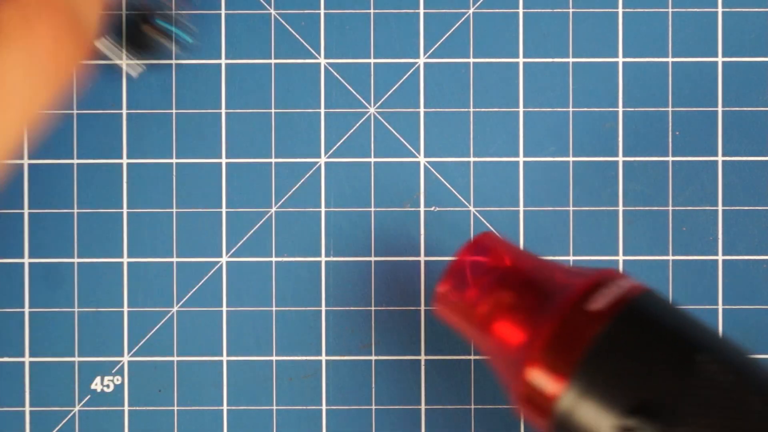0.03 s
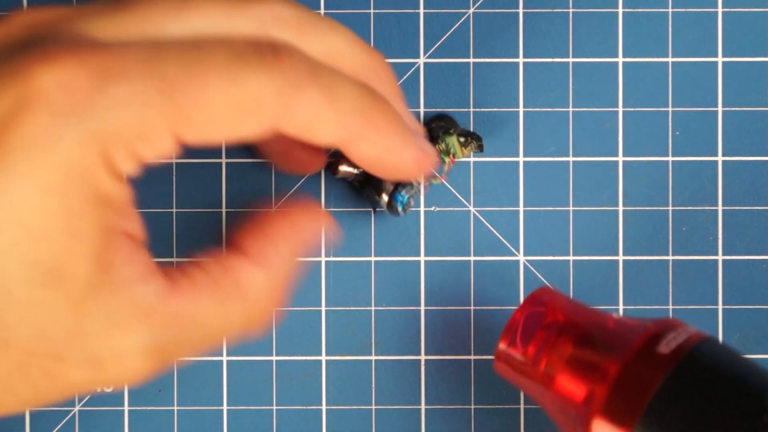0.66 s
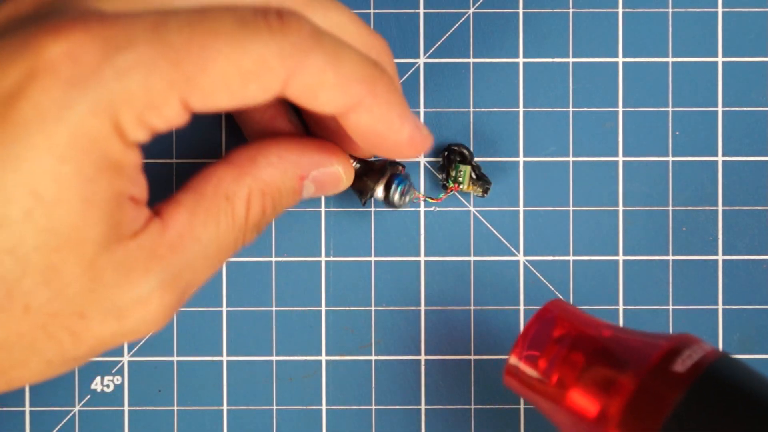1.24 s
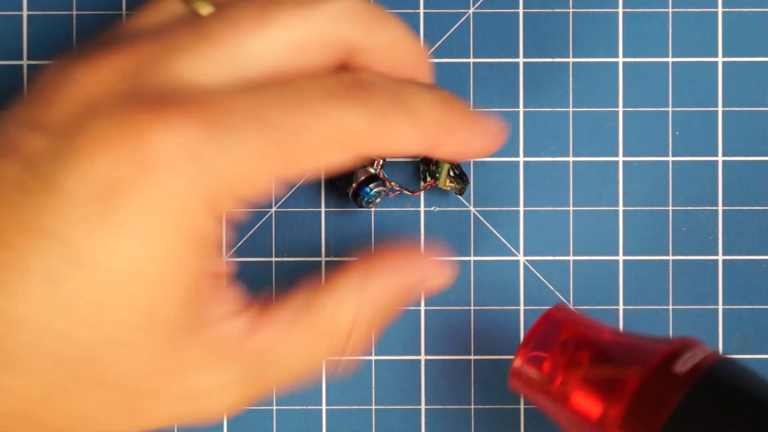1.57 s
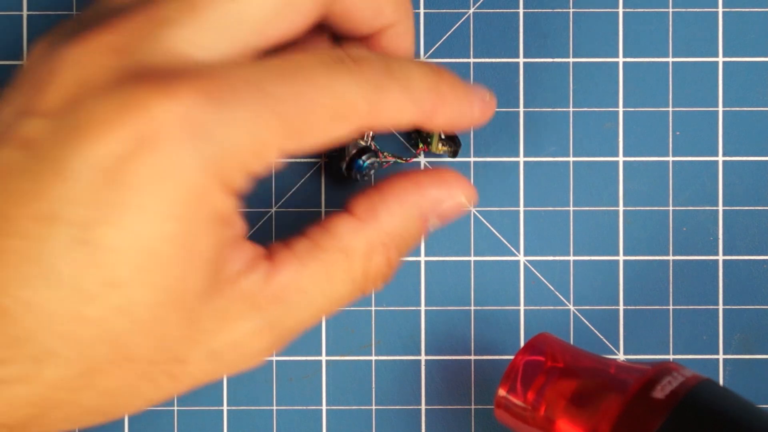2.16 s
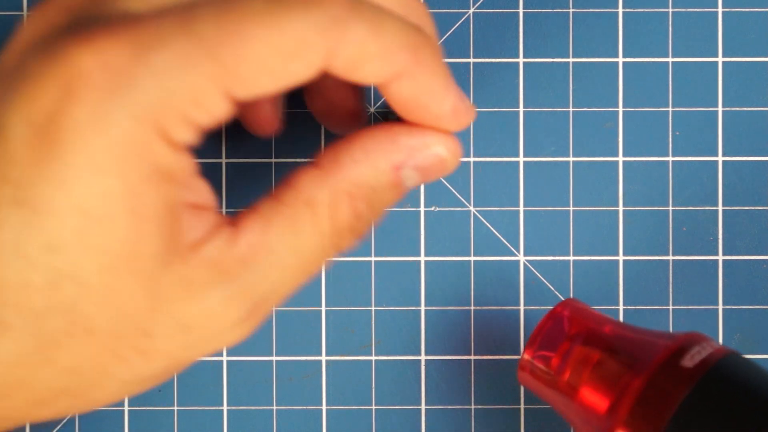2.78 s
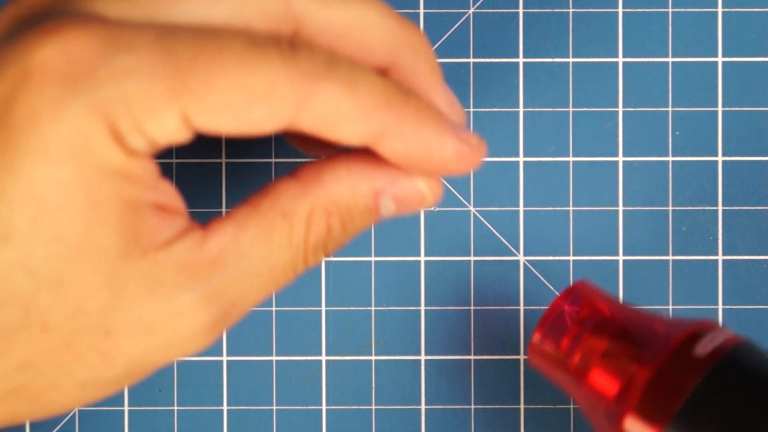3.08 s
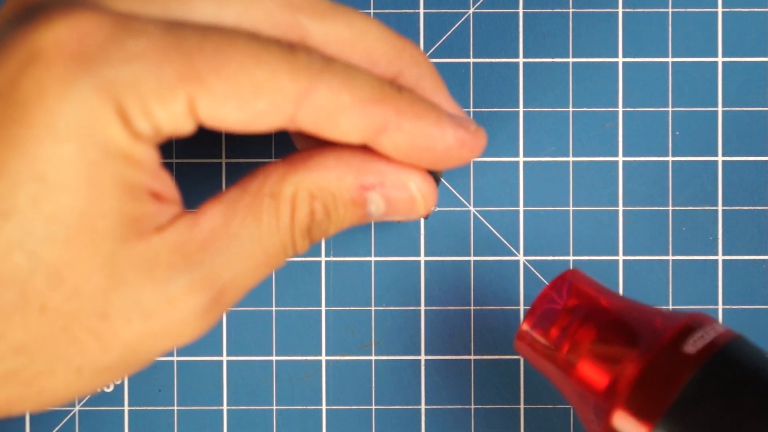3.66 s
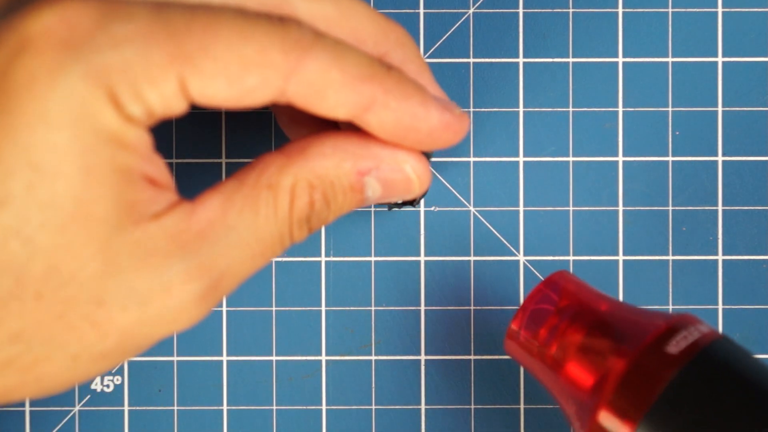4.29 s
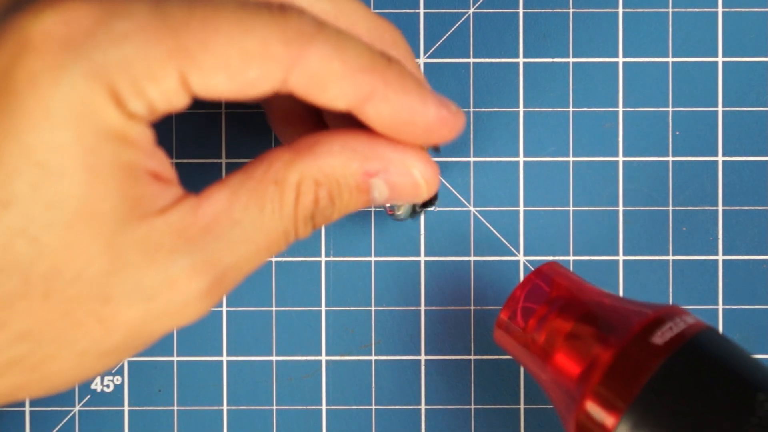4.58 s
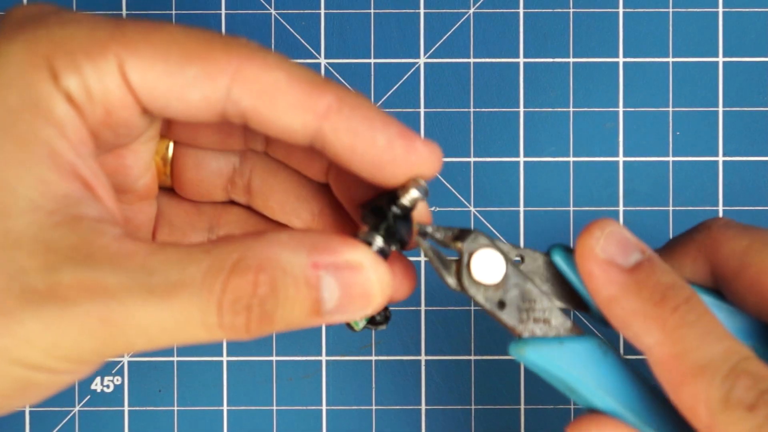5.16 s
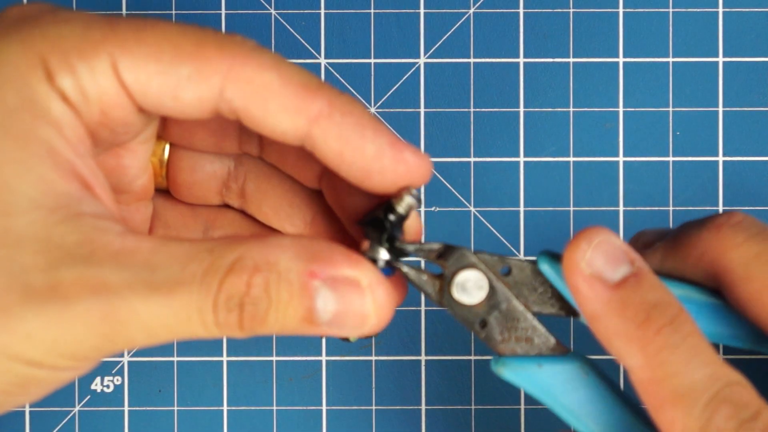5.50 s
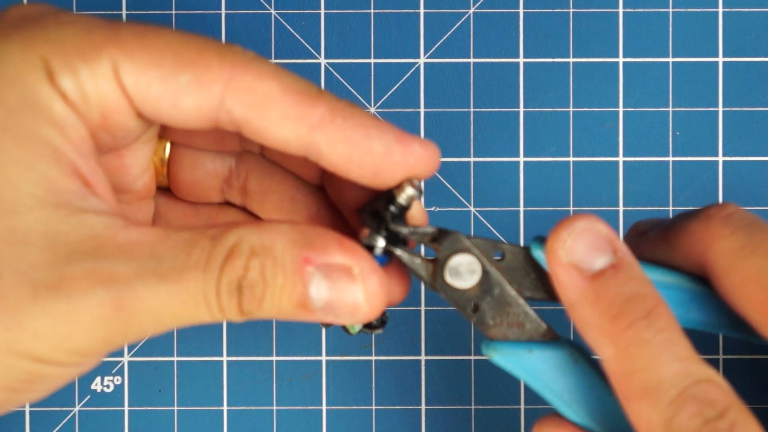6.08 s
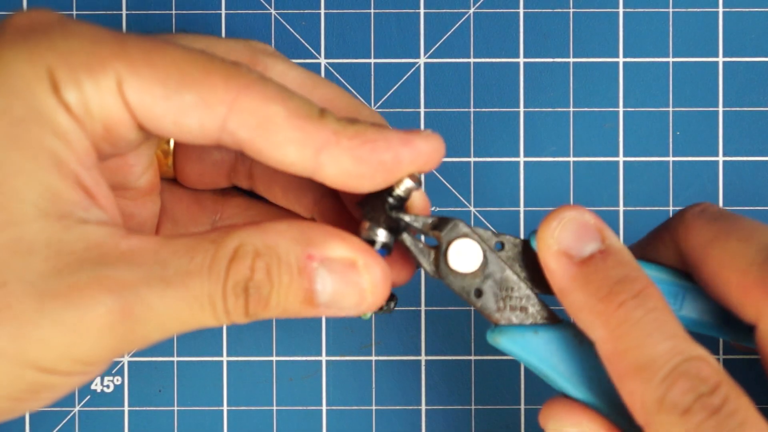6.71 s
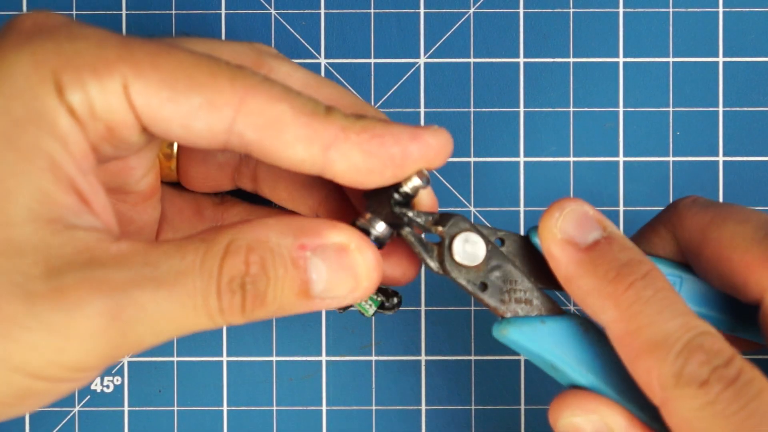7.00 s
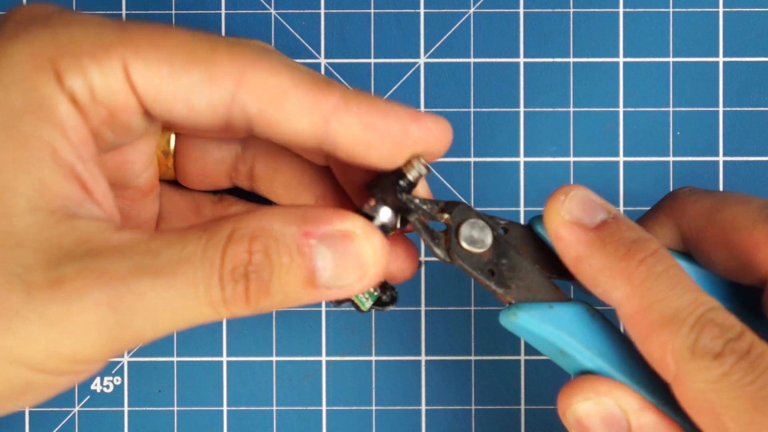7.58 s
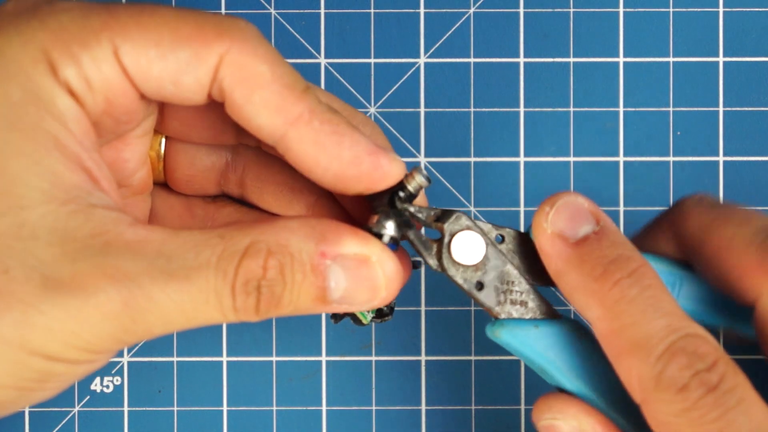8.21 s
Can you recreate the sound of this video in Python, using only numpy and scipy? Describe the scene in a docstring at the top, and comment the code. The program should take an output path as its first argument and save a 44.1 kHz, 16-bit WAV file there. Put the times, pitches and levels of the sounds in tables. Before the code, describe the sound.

A heat gun blows close to a stereo microphone, its fan whining over a steady rush of air, with a couple of clicks and low thumps early on. The draught briefly turns toward the microphone and rumbles softly. A little past halfway the gun stops abruptly, and tools clack on the workbench with a soft boom. In the quiet room, a faint squeak leads to a snip, then sparse ticks of cutters on wire.

```python
"""A heat gun blows on a small wired part above a workbench, close to a stereo microphone.
From the start its fan whines and air rushes through the barrel; two clicks and a few thumps come early.
At 1.5 s a hand cups the part, turning the draught onto the microphone, and at 3 s it draws back.
The rush ends abruptly at 4.8 s; tools click and the bench booms softly. In the quiet room a thin
squeak leads to a snip at 6.3 s, and the cutters go on ticking on wire."""
import sys
import numpy as np
from scipy import signal
from scipy.fft import rfft, irfft
from scipy.io import wavfile
from scipy.ndimage import uniform_filter1d, map_coordinates

SR = 44100
rng = np.random.default_rng(int(sys.argv[2]) if len(sys.argv) > 2 else 0)


def bounce(signal):
    """Save signal as a 16-bit WAV file at the path given by the first command-line argument."""
    frames = np.transpose(np.atleast_2d(signal))
    limited = np.clip(frames, -1, 1)
    pcm = np.round(limited * 32767).astype(np.int16)
    wavfile.write(sys.argv[1], SR, pcm)


N = 372380
T = np.arange(N) / SR
FREQ = np.maximum(np.arange(N // 2 + 1) * SR / N, 1)

# the hand cups the part in front of the nozzle, then draws back: (start [s], end [s], each move [s])
CUPPED_HAND = (1.54, 2.96, .2)


def undb(db):
    """Decibels to gain."""
    return 10 ** (np.asarray(db) / 20)


def unit(x):
    """Scale to rms 1."""
    return x / np.sqrt(np.mean(x ** 2))


def pan(db):
    """Left and right gains for a level difference."""
    return undb(np.array([[db], [-db]]) / 2)


def curve(points):
    """One value per sample from (time, value) points."""
    return np.interp(T, *np.transpose(points))


def fade(age, t60):
    """Silence before age 0, then an exponential decay."""
    return (age >= 0) * np.exp(-np.log(1000) * np.maximum(age, 0) / t60)


def hold(start, end, edge):
    """Rises to 1 around start, holds, and falls around end; each move takes edge seconds."""
    return np.clip(np.minimum(T - start, end - T) / edge + .5, 0, 1)


def swell(s, half_length):
    """A smooth rise and fall that peaks at time s."""
    return np.exp(-((T - s) / half_length) ** 2)


def walk(rate):
    """A random drift of spread about 1 that changes about rate times a second."""
    points = uniform_filter1d(rng.standard_normal(8192), 4)
    return 2 * np.interp(8 * rate * T, np.arange(len(points)), points)


def colour(points):
    """Gain at every frequency from (Hz, dB) points."""
    hz, db = np.transpose(points)
    return undb(np.interp(np.log(FREQ), np.log(hz), db))


def noise(gain):
    """Fresh noise with this gain at every frequency."""
    return irfft(rfft(rng.standard_normal(N)) * gain, N)


def wide_noise(gain, side):
    """Stereo noise of rms 1 from a mid and a side signal."""
    return unit(noise(gain) + noise(gain * side) * np.array([[1], [-1]]))


def split(x, hz):
    """The parts below and above a frequency."""
    low = irfft(rfft(x) / (1 + (FREQ / hz) ** 8), N)
    return low, x - low


def room_tone(hiss_db=-57, rumble_db=-60):
    """Microphone hiss over a low rumble that swells as the hands lean on the bench."""
    # the quiet room: (frequency [Hz], density [dB])
    spectrum = [(12, -44), (20, -7), (60, -2), (81, -9.5), (187, -18), (228, -20), (270, -22.5), (590, -29),
                (1090, -34), (1440, -36), (16000, -49)]
    # hands leaning on the bench: (time [s], level [dB], half length [s])
    leans = [(6.45, -66, 0.35), (8.05, -60, 0.26)]
    low, high = split(wide_noise(colour(spectrum), side=.87), hz=130)
    rumble = undb(rumble_db) + sum(undb(db) * swell(s, length) for s, db, length in leans)
    return (unit(low) * rumble + high * undb(hiss_db)) * pan(.4)


def bench_boom(rise_s=.012, right_lead_rad=1.92):
    """Each knock sets the bench top swinging."""
    # knocks on the bench: (time [s], level [dB], pitch [Hz], t60 [s])
    knocks = [(4.896, -37, 74.6, 0.16), (4.933, -30, 60.5, 0.83), (4.94, -37, 99.5, 0.67),
              (6.35, -44.5, 90.4, 0.6), (7.08, -45, 68, 0.17)]
    out = 0
    for s, db, hz, t60 in knocks:
        age = T - s
        swing = np.sin(2 * np.pi * hz * age + np.array([[0], [right_lead_rad]]))
        out = out + undb(db) * np.clip(age / rise_s, 0, 1) * fade(age, t60) * swing
    return out


def squeak(level_db=-77.5, jitter_hz=18, flicker_db=2, thinning_db_per_octave=85):
    """A faint, unsteady pure tone just before the snip; it thins out as it rises."""
    # the squeak's wavering course: (time [s], pitch [Hz])
    glide = [(6.015, 5730), (6.045, 5980), (6.085, 6000), (6.125, 5770), (6.17, 5820), (6.215, 6050),
             (6.27, 6380), (6.325, 5750)]
    hz = curve(glide)
    phase = 2 * np.pi * np.cumsum(hz + jitter_hz * walk(40)) / SR
    db = level_db - thinning_db_per_octave * np.log2(hz / hz.min()) + flicker_db * walk(6)
    return np.sqrt(2) * undb(db) * hold(glide[0][0], glide[-1][0], edge=.015) * np.sin(phase)


def tool_clicks(crack_t60=.013, room_t60=.3, room_rise_s=.0036, lead_s=.004):
    """A contact cracks and rings the steel; the room answers with a diffuse tail."""
    # clicks of tools and wire, and the snip's short echo just after it:
    # (time [s], attack rms [dB], tilt [dB/octave], room [dB], ring [dB])
    clicks = [(0.2151, -25, -7, 3, -3), (0.2735, -27.5, -7, -8, -20), (4.8952, -35.5, 4, -5.5, -3),
              (4.9278, -33, 0.5, -2.5, -18), (4.936, -31.5, 2.5, -8, -11), (4.9462, -47, -3, -3, -6),
              (5.0375, -56, -4, 0, -12), (5.5136, -52, -1, -8, -16), (5.586, -64, -4, -3, -17),
              (5.6075, -66, -3, -7, -14), (5.6243, -67, -2, -6, -14), (6.347, -49.5, -3, -7, 4),
              (6.364, -70, -5, 8, -12), (6.412, -67, -5, 4, -12), (6.8895, -71, 4, -10, -12),
              (7.103, -72, -4.5, 3, -10), (8.285, -56, 4, -3, -12)]
    # modes of the small steel parts: (frequency [Hz], level [dB], t60 [s])
    steel_modes = [(1052, -13, .01), (1625, -17, .008), (2860, -6, 0.0099), (3860, -8, .008),
                   (4470, 1.5, .008), (5690, 2.5, .008), (7530, -20, .008), (9370, 2.5, 0.0087),
                   (10900, -5, .009), (13340, -8, .008)]
    # a contact's crack and its echo in the room: (frequency [Hz], density [dB])
    crack_spectrum = [(200, -27), (600, -14), (1400, -3), (2500, -6.5), (5000, 3), (7000, -1), (10000, 2),
                      (15500, -6)]
    out, size = np.zeros((2, N + SR)), SR // 2
    age = np.arange(size) / SR - lead_s
    attack = (age >= 0) & (age < .003)
    octaves = np.log2(np.maximum(np.arange(size // 2 + 1) * SR / size, 1000) / 5000)
    grit = [unit(noise(colour(crack_spectrum))) for _ in range(3)]
    for s, db, tilt_db, room_db, ring_db in clicks:
        pick = rng.integers(N - size)
        crack, left, right = (g[pick:pick + size] for g in grit)
        # the grip detunes the modes a little from one contact to the next
        detune = 1 + .017 * rng.standard_normal(len(steel_modes))
        ring = sum(undb(mode_db) * np.sin(2 * np.pi * hz * ratio * age) * fade(age, t60)
                   for (hz, mode_db, t60), ratio in zip(steel_modes, detune))
        direct = crack * fade(age, crack_t60) + undb(ring_db) * ring
        tail = np.array([left, right]) * fade(age, room_t60) * np.clip(age / room_rise_s, 0, 1)
        click = unit(direct) * pan(2.5) + undb(room_db) * unit(tail)
        # each click has its own brightness, from dull to sharp
        click = irfft(rfft(click) * undb(tilt_db * octaves), size)
        start = int((s - lead_s) * SR)
        out[:, start:start + size] += undb(db) * click / click[:, attack].std()
    return out[:, :N]


def draught(level_db=-50, deflected_db=9, build_s=.96, surge_below_db=19.5, surge_s=.08):
    """Air off the bench buffets the microphone, with low thumps: one knock, the rest puffs of air."""
    # wind on the microphone ports: (frequency [Hz], density [dB])
    spectrum = [(8, 3.5), (20, -4), (38, -4.5), (62, -9.5), (100, -14), (160, -31.5), (400, -55.5)]
    # microphone thumps: (time [s], level [dB], pitch [Hz], half length [s], left minus right [dB])
    low_thumps = [(0.231, -30.5, 93, 0.025, -13), (0.291, -24.5, 69.5, .012, -13),
                  (.311, -21.5, 40.4, .022, -12.5), (2.124, -21.5, 37, .017, -16)]
    # the draught is weak until the hand turns the jet towards the microphone
    age = T - CUPPED_HAND[0]
    deflected = np.clip(age / build_s, 0, 1) * fade(age, t60=62)
    strength = undb(level_db + deflected_db * deflected + walk(3))
    thumps = 0
    for s, db, hz, length, pan_db in low_thumps:
        strength += undb(db - surge_below_db) * swell(s, surge_s)
        thumps -= undb(db) * pan(pan_db) * swell(s, length) * np.sin(2 * np.pi * hz * (T - s))
    return wide_noise(colour(spectrum), side=.79) * strength * pan(-1) + thumps


def brushes(shaft_angle, level_db=-60, db_per_order=-.4):
    """The motor's brushes buzz once a turn: a row of faint high harmonics."""
    out = np.zeros((2, N))
    for step, order in enumerate(range(12, 38)):
        phases = rng.uniform(0, 2 * np.pi) + rng.standard_normal((2, 1))
        level = undb(level_db + db_per_order * step + 2 * walk(.92))
        out += level * np.sin(order * shaft_angle + phases)
    return out


def shaft(final_hz=396, shortfall_hz=2.4, warm_s=2.8, jitter_hz=.22):
    """The fan shaft's angle in radians; it creeps up to speed as it warms."""
    hz = final_hz - shortfall_hz * np.exp(-T / warm_s) + jitter_hz * walk(25)
    return 2 * np.pi * np.cumsum(hz) / SR


def fan(shaft_angle, blades=5, waver_db=1.05, sway_db=.13, flutter=.11, smear_rad=.0494):
    """Shaft harmonics, strongest at the blade rate; uneven inflow shakes their level and pitch."""
    # blade tone and overtones:
    # (order [x shaft rate], level [dB], cupped lift [dB], left minus right [dB], left lead [rad])
    blade_tones = [(5, -34.5, 0.9, 1, .15), (10, -45, 1.8, -2, 0.63), (20, -63.5, 10, 0, .9),
                   (35, -70.5, 13, -4, -.5)]
    # weaker motor tones: (order [x shaft rate], level [dB], left minus right [dB], left lead [rad])
    motor_tones = [(1, -46.5, 14, -1), (2, -49.5, -3.5, 0), (3, -49.5, 0.5, 1.25), (4, -43, 5, -1.8),
                   (8, -49, -2, 1), (9, -55.5, 6, -7.5), (17, -54, 6, -1.73), (18, -68, -5, -8),
                   (23, -61.5, -17.5, 4), (30, -73.5, -0.5, 11.5), (31, -61, 3, -3.5)]
    # the whine swells and dips as the gun is first aimed: (time [s], level change [dB])
    aiming = [(0, 0.5), (.11, 3.5), (.29, -1), (.4, 0)]
    aim_db, cupped = curve(aiming), hold(*CUPPED_HAND)
    tones = []
    for order, db, lift_db, pan_db, lead in blade_tones:
        # the cupped hand reflects the overtones towards the microphone
        change_db = aim_db + lift_db * cupped + waver_db * np.sqrt(order / blades) * walk(1.2)
        tones.append((order, db + change_db, pan_db, lead))
    for order, db, pan_db, lead in motor_tones:
        # as the hand moves, short waves swing in and out of step with their reflections
        tones.append((order, db + sway_db * order ** .29 * walk(.7), pan_db, lead))
    out = np.zeros((2, N))
    for order, db, pan_db, lead in tones:
        level = undb(db) * (1 + flutter * walk(40))
        phase = order * shaft_angle + smear_rad * np.sqrt(order) * walk(30) + np.array([[lead], [0]])
        out += np.sqrt(2) * level * pan(pan_db) * np.sin(phase)
    return out


def mat_echo(x, lag_ms=2.4, drift_ms=.05, echo_gain=.25):
    """The mat returns the hiss a moment later; the lag drifts with the hand, so fine ripples slide."""
    lag = (lag_ms + drift_ms * walk(.5)) * SR / 1000
    hiss, now = split(x, hz=5476)[1], np.arange(N)
    return x + echo_gain * np.array([np.interp(now - lag, now, channel) for channel in hiss])


def hand_gap(x, width_octaves=.1, drift_db=.86, patch_hz=700, patch_s=.64):
    """The resonance between nozzle and hand slides with each pose; small moves shift the treble."""
    # the resonance in each pose of the hand: (centre [Hz], lift [dB])
    opened, cupped, drawn_back = (4450, 1.4), (7300, .8), (7050, 2)
    hz, s, frames = signal.stft(x, SR, nperseg=512)
    start, end, move = CUPPED_HAND
    times = [start - move, start + move, end - move, end + move]
    centre, lift_db = (np.interp(s, times, c) for c in zip(opened, cupped, cupped, drawn_back))
    octaves_away = np.log2(np.maximum(hz, 1)[:, None] / centre)
    resonance_db = lift_db * np.exp(-(octaves_away / width_octaves) ** 2)
    grid = np.meshgrid(s / patch_s, hz / patch_hz)
    patches = map_coordinates(rng.standard_normal((64, 64)), grid, mode="mirror")
    treble_db = drift_db * patches * np.minimum(hz[:, None] / centre, 1)
    return signal.istft(frames * undb(resonance_db + treble_db), SR)[1][:, :N]


def air_rush(body_db=-29.5, hiss_db=-40.5, churn_db=.46):
    """Turbulence shaped by the barrel, close and a little left; body and hiss churn separately."""
    # turbulence in the nozzle: (frequency [Hz], density [dB])
    turbulence = [(110, -24), (220, -17.5), (400, -10.5), (600, 0.0), (800, -2), (950, -13), (1400, -19.5),
                  (2500, -7), (2950, -18), (3400, -16.5), (6000, -21.5), (9700, -18), (13500, -23.5),
                  (15700, -32)]
    # resonances of the barrel and the space around it: (frequency [Hz], width [Hz], lift [dB])
    resonances = [(115, 43, 11.5), (177, 12, 10), (242, 14, 6.5), (276.2, 14, 5.5), (335, 41, 6.5),
                  (450, 20, 6), (515, 12, 9), (625.5, 82, 5.5), (685, 5.3, 5.5), (892, 24, 0),
                  (929, 17, 6.5), (1029, 43, 7.5), (1326, 220, 12.5), (1493, 16, 6), (1605, 430, 9.5),
                  (1870, 16, -6.5), (2162, 150, 5), (2784, 50, 8.5), (3254, 170, 11.5), (3505, 260, 9),
                  (4040, 338, 10), (4650, 280, 6.5), (5003, 126, 9), (5323, 450, 12), (6620, 1800, 6.5),
                  (8375, 3100, 2.5)]
    # share of the rush that reaches the microphone from the sides: (frequency [Hz], side minus mid [dB])
    spread = [(130, -5), (280, -12), (370, -8), (680, -10), (1150, -11.5), (1480, -7), (1800, -12),
              (2600, -12), (4400, -9.5), (7000, -8), (10000, -3.5), (13000, 0.5)]
    lift_db = sum(db / (1 + (2 * (FREQ - hz) / width) ** 2) for hz, width, db in resonances)
    jet = wide_noise(colour(turbulence) * undb(lift_db), colour(spread))
    body, hiss = split(jet, hz=5770)
    body = unit(body) * undb(body_db + churn_db * walk(12)) * pan(3)
    hiss = unit(hiss) * undb(hiss_db + churn_db * walk(13)) * pan(1.2)
    return mat_echo(hand_gap(body + hiss))


def scene(stop_s=4.844):
    """The gun runs; its whine and rush end abruptly with a brief dull tail, and small work at the bench
    follows."""
    shaft_angle = shaft()
    gun = fan(shaft_angle) + brushes(shaft_angle) + air_rush() + draught()
    dull_tail = split(gun, hz=4000)[0] * undb(-9.5) * fade(T - stop_s, t60=.034)
    return gun * (T < stop_s) + dull_tail + bench_boom() + tool_clicks() + squeak() + room_tone()


def record(dry, top_hz=15800):
    """The recorder cuts the top with a steep low-pass."""
    return signal.sosfilt(signal.ellip(10, .1, 80, top_hz, fs=SR, output="sos"), dry)


dry = scene()
out = record(dry)
bounce(out)
```